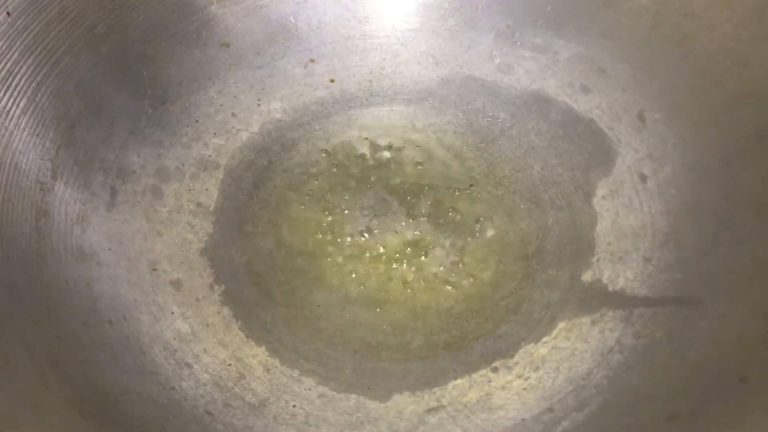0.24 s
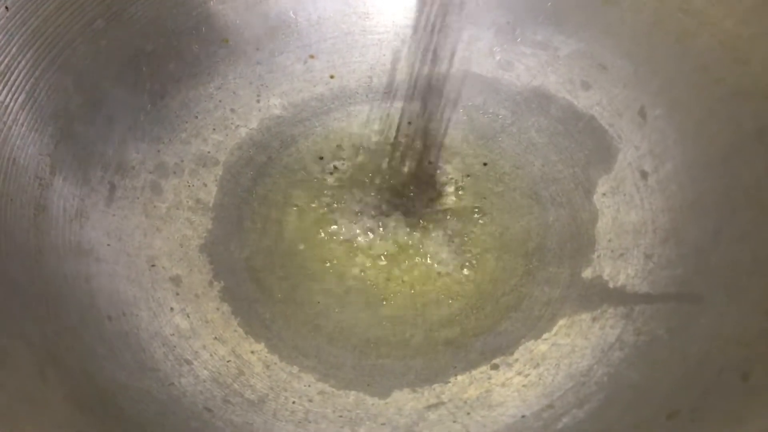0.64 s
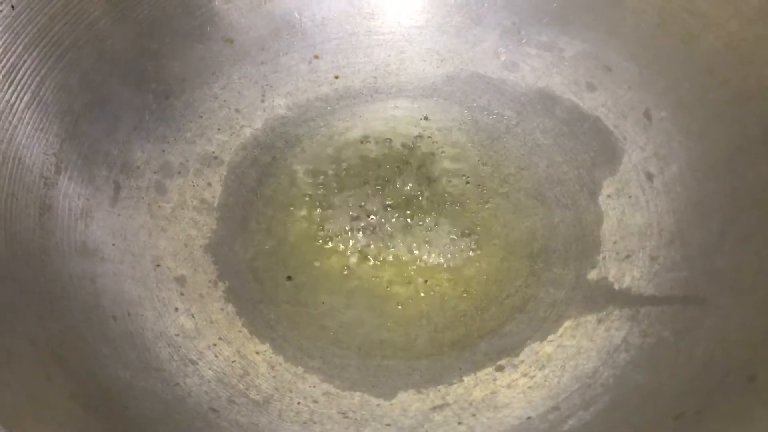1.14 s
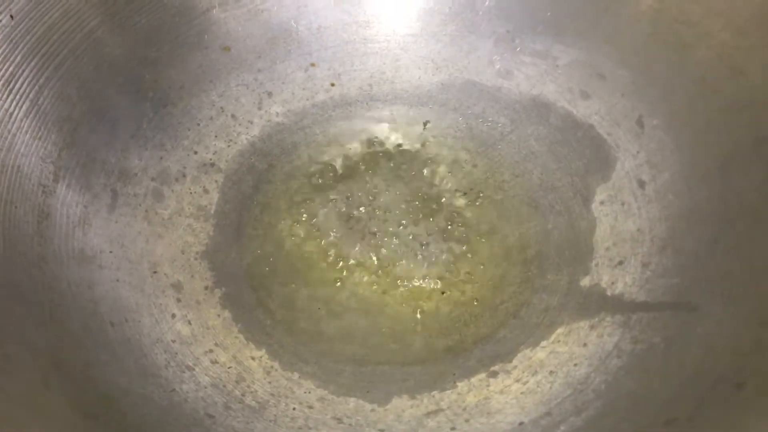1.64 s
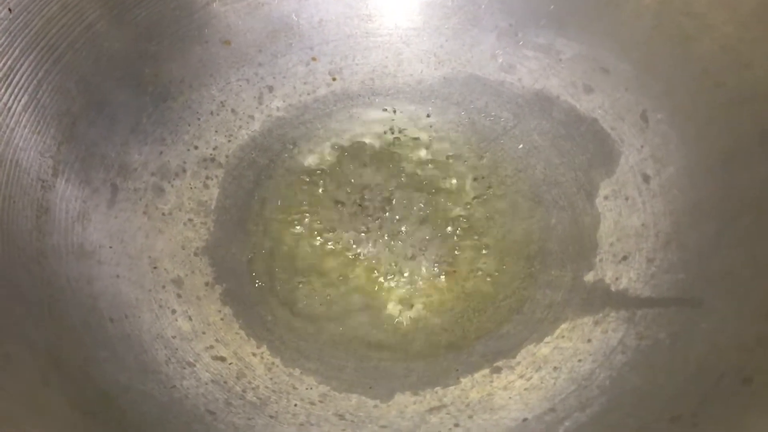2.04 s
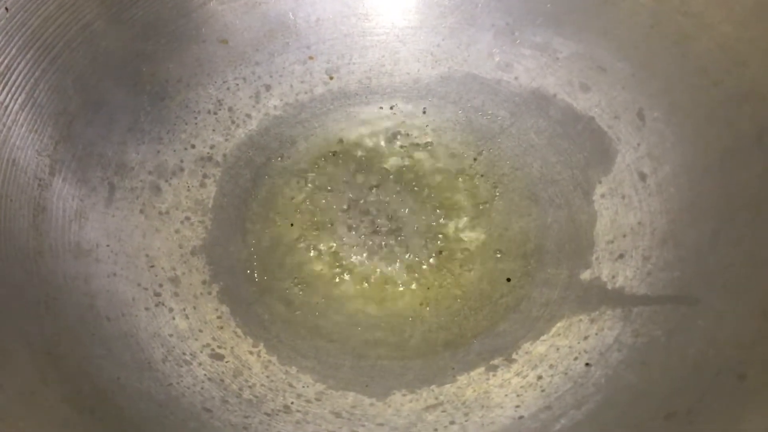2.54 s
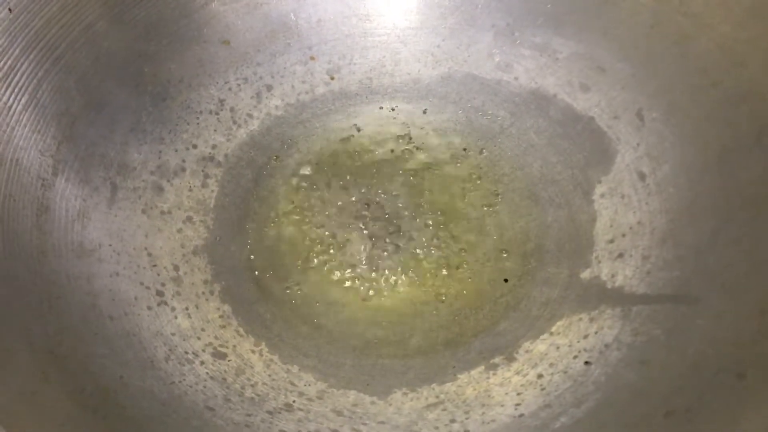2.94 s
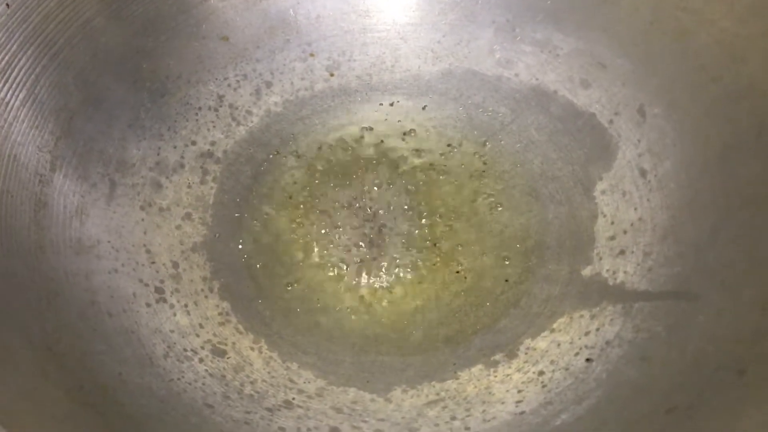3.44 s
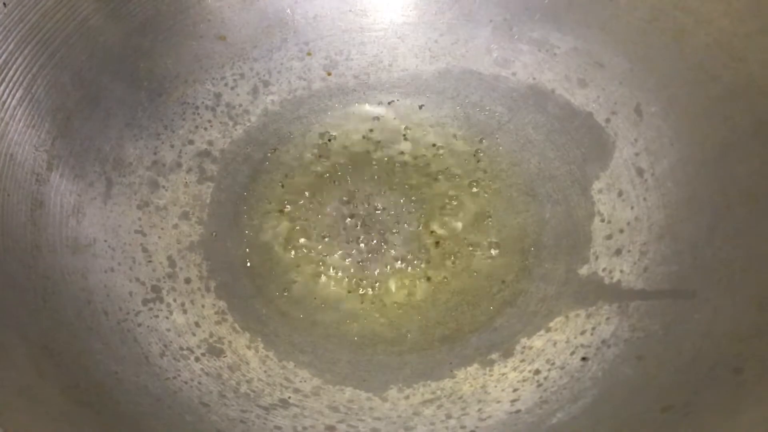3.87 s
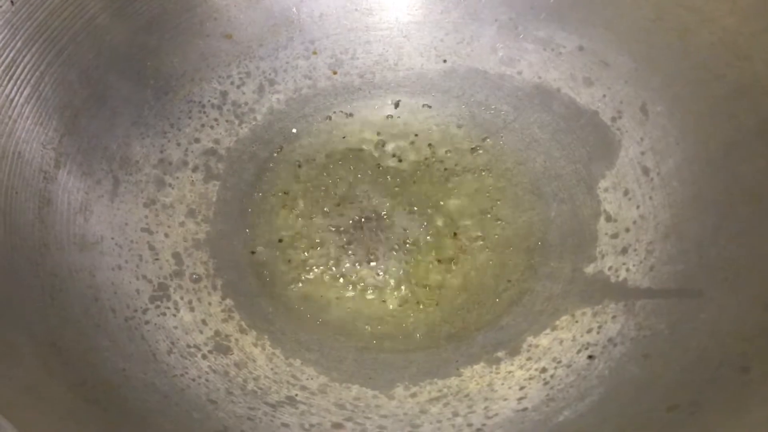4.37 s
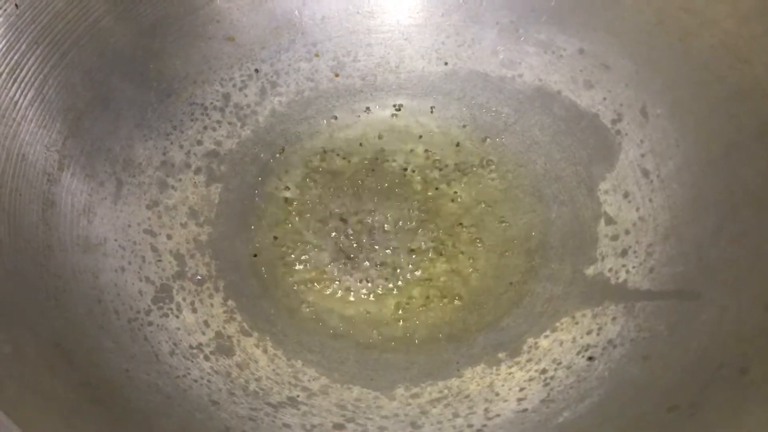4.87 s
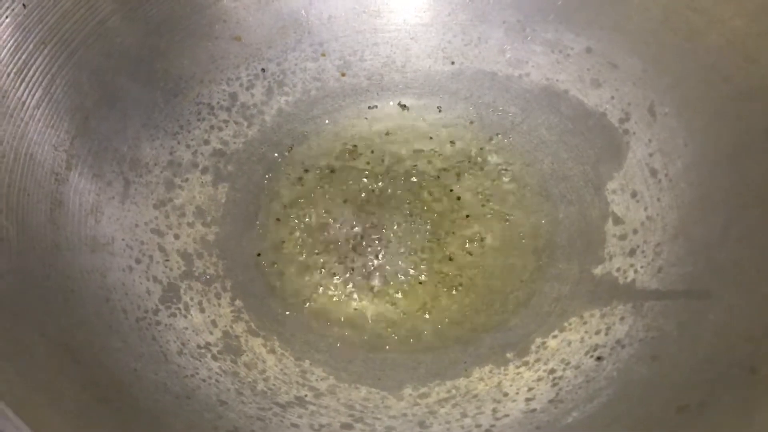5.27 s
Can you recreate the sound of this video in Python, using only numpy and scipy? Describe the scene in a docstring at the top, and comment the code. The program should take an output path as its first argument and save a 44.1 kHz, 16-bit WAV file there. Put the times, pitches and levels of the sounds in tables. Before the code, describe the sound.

A close microphone hears a deep metal pan of hot oil in a small kitchen. A quiet fizz with fine crackles runs throughout, over a faint low motor hum and rumble. A sharp snap comes at once, with a slight low bump, then a loud pop at about 0.3 seconds; only weak ticks follow until 1.0, when a very faint metallic drone swells briefly. From 1.1 seconds seeds pop more often, each a hard, bright bubble-like knock with a splash and dry snap, ringing briefly in the metal. At about 1.8 seconds a spoon jingles lightly on a tin, high and quick, while the fizz rises a little. Near 2.3 seconds flying oil knocks the microphone with a short, deep thud. Popping grows steady through 3 seconds, and from 4.2 it becomes a crowded, loud, irregular crackle, continuing undiminished to the end at 5.5.

```python
"""Mustard seeds burst in hot oil in a deep metal pan, more and more densely; each burst is a ringing steam
bubble, a splash and a dry snap that ring the pan and the small kitchen. The oil fizzes as shaped noise
and crackles with small bursts. Below lie motor tones, a low rumble and a faint metallic drone.
A spoon jingles once on a tin as struck metal modes, and flying oil knocks the microphone into a short sway."""
import sys
import numpy as np
from scipy import signal
from scipy.fft import rfft, irfft
from scipy.io import wavfile

SR = 44100
rng = np.random.default_rng(int(sys.argv[2]) if len(sys.argv) > 2 else 0)


def int16_out(signal):
    """Quantize to a 16-bit WAV file."""
    q = np.round(np.clip(np.atleast_2d(signal).T, -1, 1) * 32767)
    wavfile.write(sys.argv[1], SR, q.astype(np.int16))


N = 242946


def from_db(db):
    """Decibels to gain."""
    return 10 ** (np.asarray(db) / 20)


def rms_one(x):
    """Scale to unit rms."""
    return x / np.sqrt(np.mean(x ** 2) + 1e-20)


def peak_one(x):
    """Scale each row to unit peak."""
    return x / np.abs(x).max(axis=1, keepdims=True)


def in_time(rows):
    """Table columns as curves, one value a sample."""
    s, *columns = np.transpose(rows)
    return [np.interp(np.arange(N) / SR, s, column) for column in columns]


def ring(clicks, hz, t60):
    """A resonator: a unit click sets a decaying sine of about unit height ringing."""
    r = from_db(-60 / (t60 * SR))
    w = 2 * np.pi * hz / SR
    return signal.lfilter([0, np.sin(w)], [1, -2 * r * np.cos(w), r * r], clicks + 1e-18)


def band(x, low_hz, high_hz):
    """Band-pass of second-order slopes."""
    sos = signal.butter(2, [low_hz, min(high_hz, .47 * SR)], "band", fs=SR, output="sos")
    return signal.sosfilt(sos, x)


def coloured(spectrum):
    """Steady noise with the given spectrum; rms 1."""
    hz, level_db = np.transpose(spectrum)
    f = np.arange(N // 2 + 1) * SR / N + 1      # the 1 Hz offset keeps the logarithm finite
    gain = from_db(np.interp(np.log(f), np.log(hz), level_db))
    return rms_one(irfft(rfft(rng.standard_normal(N)) * gain, N))


def random_times(per_s):
    """Sample positions of events that fall independently at a changing rate."""
    return np.flatnonzero(rng.random(N) < per_s / SR)


def struck(touches, modes, spread_db):
    """Each touch strikes every mode of the metal with a strength of its own."""
    s, level_db = np.transpose(touches)
    luck = rng.standard_normal((len(s), len(modes)))
    out = np.zeros(N)
    for k, (hz, mode_db, t60) in enumerate(modes):
        clicks = np.zeros(N)
        clicks[(s * SR).astype(int)] = from_db(level_db + mode_db + spread_db * luck[:, k])
        out += ring(clicks, hz, t60)
    return out


def rumble():
    """Steady noise, strongest in the bass."""
    # spectrum of the rumble: pitch_hz, level_db (per Hz, relative)
    rumble_spectrum = [(18, -35), (30, -37), (91, -0.5), (210, -7), (260, -10.5), (483, -12), (546, -9.5),
                       (608, -16), (1200, -22.5), (1560, -49), (2640, -120)]
    return from_db(-49.5) * coloured(rumble_spectrum)


def hum():
    """Steady motor tones: sines that start at random phases."""
    # tones of the motor: pitch_hz, level_db (rms)
    motor_tones = [(60.86, -47), (100.1, -47.5), (155.5, -55), (207.4, -55.5)]
    t = np.arange(N) / SR
    out = np.zeros(N)
    for hz, level_db in motor_tones:
        out += from_db(level_db) * np.sqrt(2) * np.sin(2 * np.pi * (hz * t + rng.random()))
    return out


def drone():
    """A faint metallic drone swells: friction noise through a few metal modes."""
    # resonances of the rubbed metal: pitch_hz, level_db (relative), t60_s
    rubbed_modes = [(1075, -2, .035), (1480, 0, .04), (1720, -4, .03), (2905, -4, .07)]
    # swell of the drone: time_s, level_db
    swell = [(.78, -61), (.84, -59), (.97, -51.5), (1.05, -53), (1.15, -79)]
    rub = rng.standard_normal(N)
    tone = sum(from_db(level_db) * rms_one(ring(rub, hz, t60)) for hz, level_db, t60 in rubbed_modes)
    return from_db(in_time(swell)[0]) * tone


def knocks():
    """An oil hit pushes the capsule, which swings fast at first and then settles into its sway."""
    # oil hits on the microphone: start_s, level_db, sway_hz
    oil_hits = [(0.063, -23.5, 81), (2.3203, -5.5, 51.7)]
    t = np.arange(SR // 8) / SR
    out = np.zeros(N + SR)
    for s, level_db, hz in oil_hits:
        turns = hz * t + 1.22 * (1 - np.exp(-t / 0.0016))
        push = 1 - np.exp(-t / 0.0025)
        fade = from_db(level_db - 60 * t / 0.065)
        out[int(s * SR):][:len(t)] += fade * push * np.sin(2 * np.pi * turns)
    return out[:N]


def kitchen(x):
    """Dense reflections that set in after the first wall and die at a rate of their own in each band."""
    # bands of the reverberation: centre_hz, level_db (relative), t60_s
    tail_bands = [(724, -21, 1), (1080, -22.5, 0.16), (1800, -24.5, 0.15), (3380, -28.5, 0.11),
                  (5040, -25, 0.24), (6200, -26.5, 0.056), (8700, -25.5, 0.22), (13900, -35, 0.13)]
    t = np.arange(SR // 2) / SR
    onset = np.clip((t - .001) / 0.00066, 0, 1)
    tail = np.zeros(len(t))
    for hz, level_db, t60 in tail_bands:
        noise = band(rng.standard_normal(len(t)), hz / 1.32, hz * 1.28)
        # the root evens out the energy of long and short decays
        tail += from_db(level_db - 60 * t / t60) * noise / np.sqrt(t60 * SR / 14)
    return signal.fftconvolve(x, from_db(18.5) * onset * tail)[:N]


def pan(x):
    """The bowl's first echoes (far wall, rim, stove top) and the ring of its metal."""
    # resonances of the pan: pitch_hz, level_db, t60_s
    metal_modes = [(1131, -57, .15), (1392, -58, .12), (1657, -58, .15), (1910, -57, .12), (2015, -57, .12),
                   (2322, -58, .1), (3160, -58, .1), (3400, -59, .1), (3750, -58, .1), (6450, -57, .1),
                   (7050, -56, .12), (7750, -58, .1)]
    # first echoes in the bowl: delay_s, level_db
    bowl_echoes = [(.0007, -75), (.0014, -34), (.0031, -19.5)]
    out = x + sum(from_db(level_db) * ring(x, hz, t60) for hz, level_db, t60 in metal_modes)
    for lag_s, level_db in bowl_echoes:
        lag = int(lag_s * SR)
        out[lag:] += from_db(level_db) * x[:N - lag]
    return out


def spoon_on_tin():
    """A spoon jingles on a spice tin: quick touches set the modes of both metals ringing."""
    # resonances of the spoon: pitch_hz, level_db (relative), t60_s
    spoon_modes = [(9735, 0, .1), (10310, -8, .05), (11516, -5, .08), (12130, -2, .08), (12560, -12, .04)]
    # touches of the spoon: start_s, level_db
    spoon_touches = [(1.776, -36), (1.781, -39), (1.79, -27), (1.801, -40), (1.811, -32), (1.846, -32)]
    # resonances of the tin: pitch_hz, level_db (relative), t60_s
    tin_modes = [(5441, -7, .06), (6550, -6, .03), (7130, 0, .09), (8800, -8, .06), (14370, -6, .04),
                 (14500, -3, .05), (15665, -8, .06)]
    # touches of the tin: start_s, level_db
    tin_touches = [(1.77, -54), (1.795, -46), (1.81, -35), (1.83, -36)]
    return struck(spoon_touches, spoon_modes, spread_db=3) + struck(tin_touches, tin_modes, spread_db=3)


def fizz(fizz_db):
    """The oil's steady fizz: shaped noise that follows the heat of the frying in level."""
    # spectrum of the fizz: pitch_hz, level_db (per Hz, relative)
    fizz_spectrum = [(500, -16), (900, -3), (1900, 1), (3700, -1), (4700, -7), (6100, -2), (7800, -7),
                     (9000, -4), (10200, -5), (11700, -4), (13300, -5), (16000, -9)]
    return from_db(fizz_db - 7) * coloured(fizz_spectrum)


def burst_sounds(rows, draws, bubble_s, splash_s, snap_s):
    """Each burst is a steam bubble ringing a few uneven cycles, a splash of oil and a dry snap of the seed coat."""
    s, bubble_db, hz, splash_db, snap_db = [column[:, None] for column in np.transpose(rows)]
    t = np.arange(draws.shape[1]) / SR

    rise = 1 - np.exp(-t * hz * 1.05)      # the cavity opens within a cycle
    fade = from_db(-60 * t / bubble_s * (hz / 3000) ** 0.3)      # large bubbles ring longer
    bubble = rise * fade * np.sin(2 * np.pi * hz * t)
    ragged = band(draws[:, ::-1] * from_db(-60 * t / 0.0025), 1700, 4000)      # the wall tears unevenly

    tear = draws + 3.1 * (t == 0)      # a clean click leads, grit follows
    splash = band(tear * from_db(-60 * t / splash_s), 5400, 8010)
    spray = 0.022 * from_db(-60 * t / 0.0066)      # fine droplets fly on after the snap
    snap = band(tear * (from_db(-60 * t / snap_s) + spray), 8360, 14500)

    burst = from_db(bubble_db + 0.56) * peak_one(peak_one(bubble) + 0.98 * peak_one(ragged))
    burst += from_db(splash_db) * peak_one(splash)
    burst += from_db(snap_db + 5.5) * peak_one(snap)
    out = np.zeros(N + len(t))
    np.add.at(out, (s * SR).astype(int) + np.arange(len(t)), burst)
    return out[:N]


def crackle(per_s, fizz_db):
    """Small bursts of the oil at random, just standing out of the fizz."""
    at = random_times(per_s)
    luck = rng.random((len(at), 4))
    size_db = fizz_db[at] - 1.0 + 9 * luck[:, 0]
    hz = 1500 * 2.1 ** luck[:, 1]
    splash_db = size_db - 12 * luck[:, 2]
    snap_db = size_db - 12 * luck[:, 3]
    rows = np.transpose([at / SR, size_db, hz, splash_db, snap_db])
    draws = rng.standard_normal((len(at), 300))
    return burst_sounds(rows, draws, bubble_s=0.00071, splash_s=0.00095, snap_s=0.0012)


def lesser_seeds():
    """Rows for the lesser bursts: random times, sizes and bubble pitches."""
    # rate and greatest size of the lesser bursts: time_s, bursts_per_s, top_level_db (relative)
    lesser_course = [(1.0, 4.5, -41), (2.2, 15, -16.5), (4.0, 20.5, -18), (4.3, 30, -13.5), (5.51, 30, -13)]
    size_range_db, treble_range_db = 10, 24      # splash and snap lie up to the latter below the bubble
    lowest_hz, pitch_ratio = 1940, 3.08      # the ratio is of highest to lowest
    per_s, top_db = in_time(lesser_course)
    at = random_times(per_s)
    luck = rng.random((len(at), 4))
    size_db = top_db[at] - size_range_db * luck[:, 0]
    hz = lowest_hz * pitch_ratio ** luck[:, 1]
    splash_db = size_db - treble_range_db * luck[:, 2]
    snap_db = size_db - treble_range_db * luck[:, 3]
    return np.transpose([at / SR, size_db, hz, splash_db, snap_db])


def seeds():
    """Loud and lesser bursts, dealt to four spots of the pan; each spot has its own path through the kitchen."""
    # loud bursting seeds: start_s, bubble_level_db, bubble_pitch_hz, splash_level_db, snap_level_db (relative)
    loud_bursts = [(0.0629, -16.5, 3270, -13, -2), (0.2577, -27, 2450, -46, -43),
                   (0.2748, 1.5, 3210, -5.5, -4.5), (0.3824, -26.5, 1510, -41, -45),
                   (0.4767, -23, 1950, -33, -44), (0.4857, -20, 1950, -29, -25),
                   (0.6745, -32, 2560, -37, -27), (0.7229, -27, 3400, -39, -39),
                   (0.7303, -37, 1990, -39, -29), (0.8085, -32, 3540, -25.5, -35),
                   (0.8633, -29, 2080, -46, -42), (0.9293, -39, 2320, -47, -29.5),
                   (1.0458, -27.5, 1230, -45, -19), (1.0782, -7, 4020, -7.5, -11),
                   (1.1216, -19.5, 1140, -20, -5.5), (1.1854, -23, 2260, -25, -6.5),
                   (1.1906, -8, 3130, -19, -23), (1.2519, -13, 1310, -18, -32),
                   (1.2606, -16, 1260, -24, -34), (1.383, 0, 3110, -44, -20), (1.4036, -14, 3990, -31, -4),
                   (1.4809, -12, 3440, -12.5, -11), (1.5117, -13.5, 3380, -32, -20),
                   (1.5155, -24, 3390, -20, -31), (1.5251, -12, 3290, -11.5, -17),
                   (1.5879, -15, 3200, -8, -8), (1.5952, -14, 3400, -10, -14),
                   (1.6182, -21, 1380, -15, -20), (1.7171, -13.5, 3190, -30, -21),
                   (1.7357, -7.5, 3210, -30, -31), (1.7497, -19, 1710, -21, -15.5),
                   (1.7578, -12.5, 2570, -19, -12), (1.7666, -25, 3390, -14, -25),
                   (1.8828, -15, 3220, -11, -12.5), (1.9921, -0.5, 3190, -35, -21),
                   (2.0001, -28, 3270, -31, -34), (2.0155, -9, 4080, -4.5, -3),
                   (2.0501, -6.5, 3380, -13, -26), (2.0992, -19.5, 1490, -22.5, -25),
                   (2.1916, -9.5, 2430, -16.5, -21), (2.2441, -21, 1430, -19, -13),
                   (2.3069, -17, 2450, -22, -33), (2.3204, -21.5, 1120, -10.5, -2.5),
                   (2.3695, -17, 4600, -20, -22), (2.3912, -21, 2120, -17, -24),
                   (2.4281, -15.5, 1440, -14.5, -20), (2.4642, -8, 3380, -16, -12.5),
                   (2.4748, -14.5, 3490, -33, -35), (2.4849, -14.5, 3630, -27, -9.5),
                   (2.576, -18, 3550, -26, -41), (2.652, -14.5, 1400, -22, -27),
                   (2.6605, -15.5, 2415, -14, -20), (2.6993, -12, 4300, -10.5, -23),
                   (2.7136, -10.5, 4690, -18, -23), (2.7791, -12.5, 3370, -19, -43),
                   (2.8254, -6.5, 2380, -13, -15), (2.8317, -12.5, 2370, -5, -7),
                   (2.835, -4.5, 3760, -7, -13), (2.8578, -1, 2470, -8.5, -27),
                   (2.888, -19, 2240, -16, -40), (2.9162, -18.5, 2300, -15, -13.5),
                   (2.9314, -27, 3420, -33, -18), (2.9399, -14, 2200, -27, -35),
                   (2.9751, -15.5, 3480, -13.5, -4), (3.0016, -9.5, 3670, -15, -23),
                   (3.0341, -7, 2150, -13, -15), (3.0613, -10, 2690, -7.5, -7.5),
                   (3.1002, -9.5, 3240, -12.5, -23), (3.2123, -5, 2157, -32, -15),
                   (3.2353, -16, 3700, -13, -12), (3.2791, -16, 2415, -6.5, -1.5),
                   (3.3806, -7.5, 3800, -5.5, -11), (3.4539, -14, 2410, -21, -30),
                   (3.4666, -5, 2360, -15, -16), (3.4704, -28, 4460, -9, -20),
                   (3.5324, -11.5, 3290, -13, -9), (3.603, -9.5, 3440, -14, -13.5),
                   (3.672, -3, 2480, -7, -27), (3.675, -30, 2330, -28, -9.5),
                   (3.6808, -20.5, 2050, -28, -30), (3.7116, -26.5, 1360, -6, -3.5),
                   (3.7154, -13.5, 2240, -12, -22), (3.7987, -4, 3250, -10.5, -22),
                   (3.8253, -11.5, 3380, -30, -29), (3.8513, -13, 4330, -6, -16),
                   (3.8661, -6, 2700, -25, -15), (3.9035, -34, 4270, -13, -38),
                   (3.9421, -16, 2290, -9.5, -24), (3.9834, -17, 3320, -27, -10.5),
                   (3.9957, 0, 3340, -3.5, -16), (4.0071, -8, 3590, -34, -24),
                   (4.0159, -14, 2490, -14, -18), (4.04, -15.5, 2990, -30, -33),
                   (4.0975, -11, 2730, -8, -7), (4.1668, -11.5, 4000, -13, -7),
                   (4.1796, -10, 1990, -14, -7.5), (4.1825, -8, 3350, -14, -34),
                   (4.2576, 0, 3150, -23, -6.5), (4.2831, -2.5, 3100, -5, -29),
                   (4.2986, -23, 3250, -17, -6), (4.308, -0.5, 2360, -6, -24),
                   (4.3195, -14, 4230, -29, -23), (4.3413, -6, 2600, -8, -21),
                   (4.3479, -6, 2360, -13, -5.5), (4.3702, -15, 3650, -10, -24),
                   (4.3745, -6.5, 3070, -8, -8), (4.3851, -8, 2570, -11.5, -9.5),
                   (4.4385, -14.5, 1735, -31, -22), (4.455, -12.5, 3040, -9.5, -14),
                   (4.4778, -14, 3350, -27, -8), (4.4814, -15, 4100, -7.5, -11),
                   (4.489, -12, 3300, -28, -10), (4.4959, -9.5, 4140, -26, -14),
                   (4.5112, -1.5, 3800, -10, -19), (4.5193, -17, 3420, -12, -16),
                   (4.5379, -9, 3470, -12, -24), (4.5444, -9, 2620, -10.5, -15),
                   (4.5686, -7.5, 2250, -32, -17), (4.5868, -7, 4530, -11, -10.5),
                   (4.6006, -11.5, 2200, -26, -29), (4.6057, -16, 2860, -18, -7),
                   (4.6289, -26, 2110, -21, -7), (4.6456, -8.5, 2200, -35, -30),
                   (4.6701, -11.5, 3980, -14, -10), (4.6894, -19, 4300, -8, -8.5),
                   (4.7058, -7, 2450, -10, -13), (4.7101, -21, 2840, -13, -10.5),
                   (4.7312, -0.5, 2450, -26, -10), (4.7444, -8.5, 2300, -11, -30),
                   (4.8311, -7.5, 2680, -9, -9), (4.8732, -6.5, 2410, -38, -5.5),
                   (4.8775, -17, 3550, -6, -24), (4.9176, -11, 2260, -23, -27),
                   (4.9292, -11.5, 3420, -4.5, -7), (4.9364, -6.5, 3240, -19, -17),
                   (4.9393, -5, 2280, -16, -12), (4.9496, -7, 2460, -17, -15),
                   (4.9648, -25, 3450, -6.5, -7.5), (4.9707, -4, 2880, -23, -23),
                   (4.9771, -9, 2770, -11, -23), (4.9907, -1.5, 1900, -4.5, -13),
                   (5.0243, -7, 3040, -26, -24), (5.0306, -4, 3410, -28, -10),
                   (5.0412, -36, 4200, -7.5, -24), (5.051, -12, 2320, -27, -12),
                   (5.0756, -5, 3100, -11, -10.5), (5.0817, -30, 2450, -26, -22),
                   (5.1482, -9.5, 2480, -9, -20), (5.1519, -3, 2420, -25, -14),
                   (5.1786, -9.5, 3200, -12, -3.5), (5.2329, -2, 2920, -16, -19),
                   (5.2454, 1, 2840, -5.5, 0), (5.3173, -7.5, 3070, -10, -27),
                   (5.3508, -16, 2200, -11, -15), (5.3844, -13, 2130, -10, -8),
                   (5.3994, -9.5, 3230, -8, -30), (5.4173, -4.5, 2140, -27, -20),
                   (5.4588, -9.5, 3930, -21, -33), (5.4704, -9, 2190, -15, -14),
                   (5.4863, -11, 2730, -17, 0), (5.5021, 1, 2970, -15, -2)]
    rows = np.vstack([loud_bursts, lesser_seeds()])
    draws = rng.standard_normal((len(rows), 400))
    out = np.zeros(N)
    for spot in range(4):
        bursts = burst_sounds(rows[spot::4], draws[spot::4], bubble_s=0.0036, splash_s=0.0074, snap_s=0.001)
        direct = pan(bursts)
        out += direct + kitchen(direct)
    return out


def scene():
    """Room, spoon and frying oil under the bursting seeds."""
    # course of the frying: time_s, small_bursts_per_s, fizz_level_db (relative)
    frying_course = [(0, 21.4, -40), (.58, 15, -42), (.63, 60, -35), (.76, 35, -40), (.88, 40, -39.5),
                     (1.1, 79, -42.5), (1.7, 38, -37), (1.79, 183, -33), (1.9, 59, -37), (2.0, 81, -39),
                     (2.8, 70, -38), (3.4, 100, -36), (4.1, 63, -34.5), (4.6, 122, -35.5), (5.51, 120, -44)]
    per_s, fizz_db = in_time(frying_course)
    room = rumble() + hum() + drone()
    small = spoon_on_tin() + crackle(per_s, fizz_db)
    oil_and_spoon = small + kitchen(small) + fizz(fizz_db)
    return (room + knocks() + oil_and_spoon + seeds())[None]


def record(dry):
    """The capsule drops the deepest bass and dips in the treble, peaks are rounded, the top is cut."""
    dip_hz, dip_width_hz, dip_share = 10400, 600, .5
    cutoff_hz = 16500
    thin = signal.sosfilt(signal.butter(2, 40, "high", fs=SR, output="sos"), dry)
    b, a = signal.iirpeak(dip_hz, dip_hz / dip_width_hz, fs=SR)
    dipped = thin - dip_share * signal.lfilter(b, a, thin)
    rounded = dipped / (1 + np.abs(dipped) ** 4.0) ** (1 / 4.0)
    return signal.sosfilt(signal.cheby2(20, 90, cutoff_hz, fs=SR, output="sos"), rounded)


dry = scene()
out = record(dry)
int16_out(out)
```